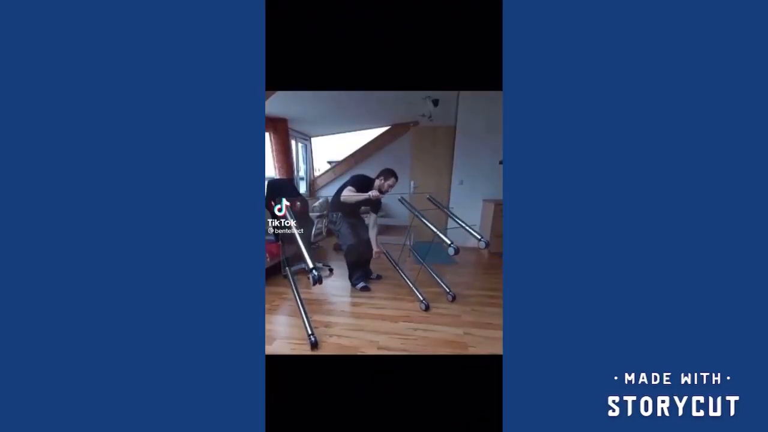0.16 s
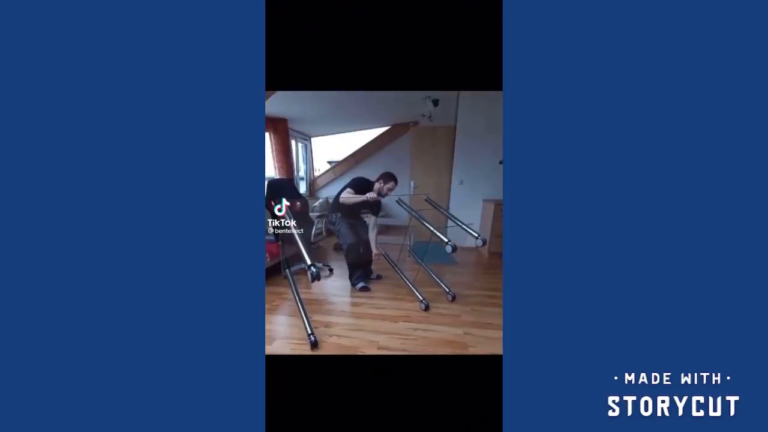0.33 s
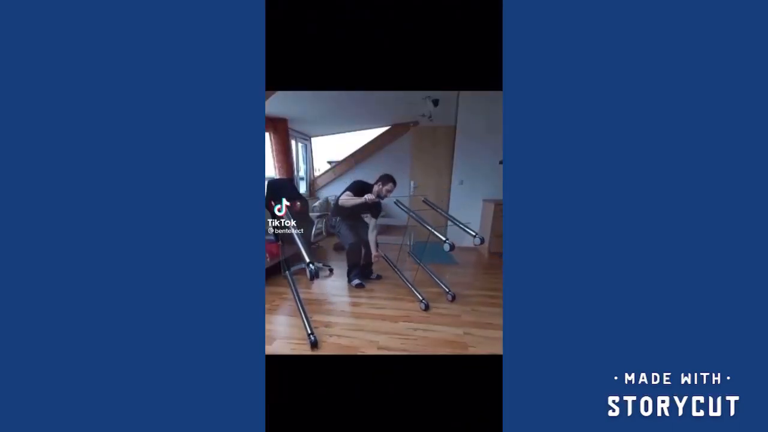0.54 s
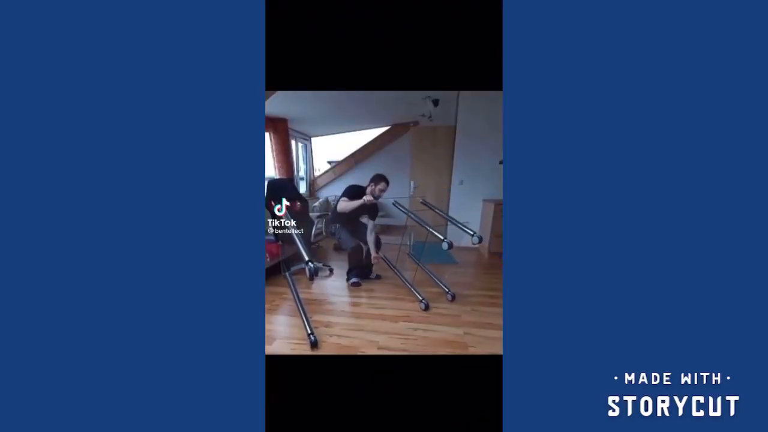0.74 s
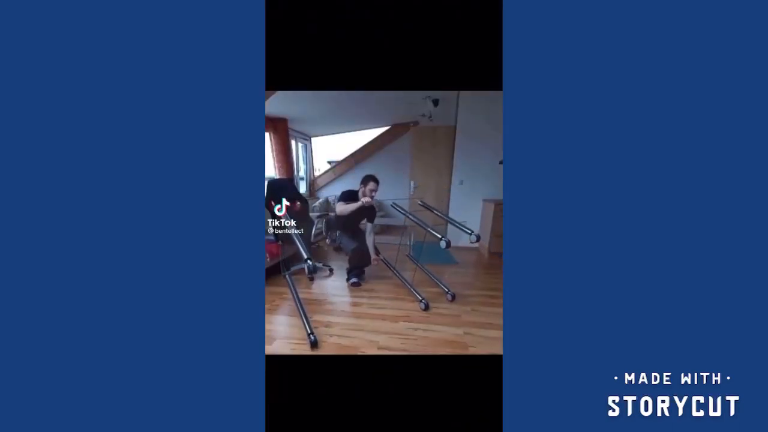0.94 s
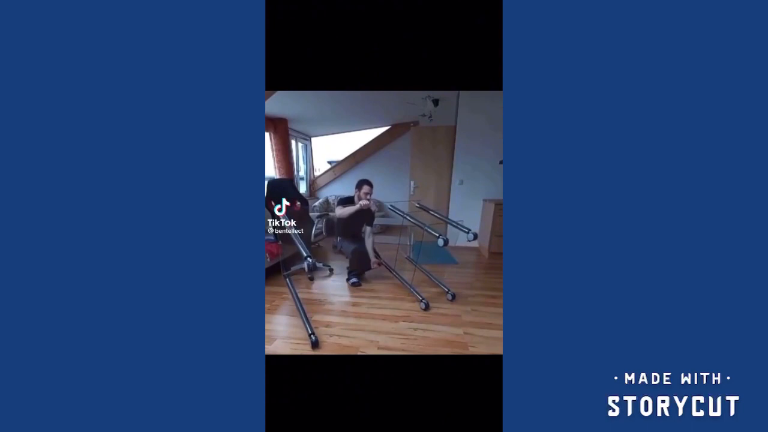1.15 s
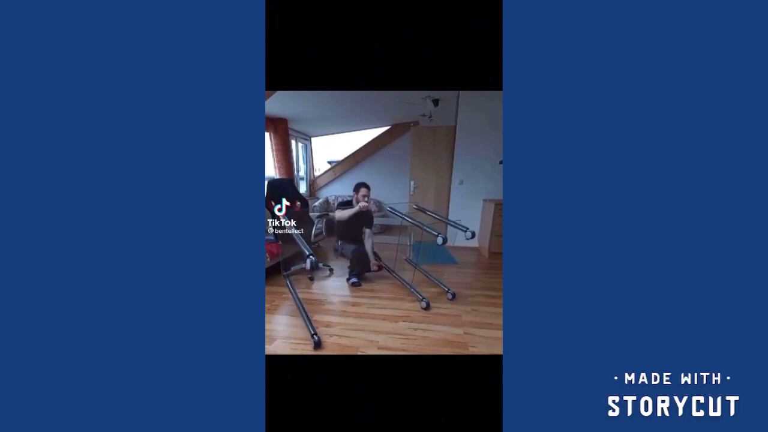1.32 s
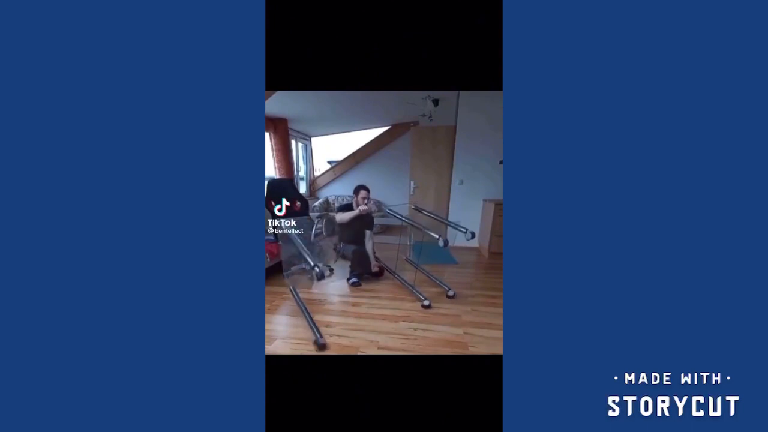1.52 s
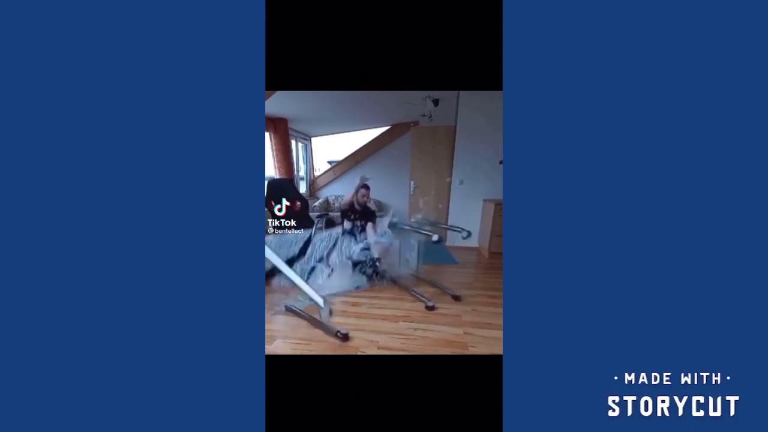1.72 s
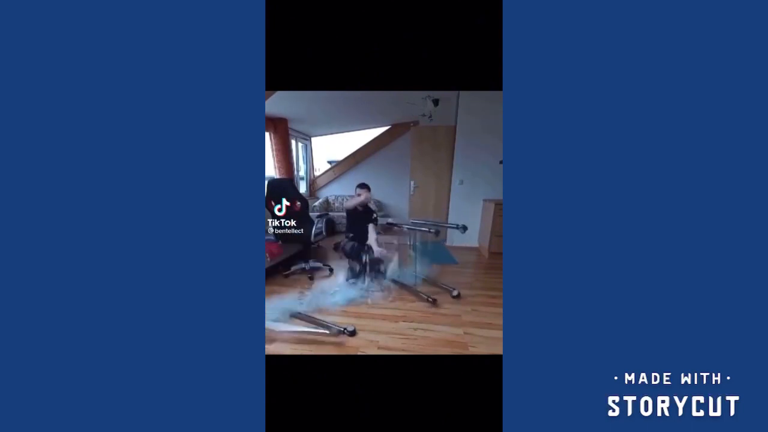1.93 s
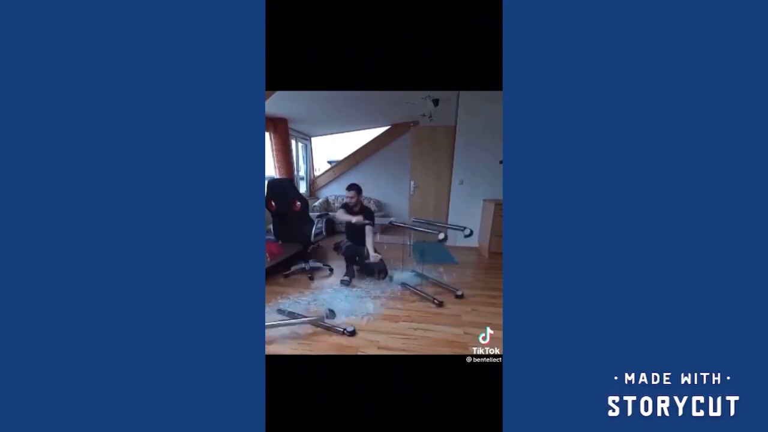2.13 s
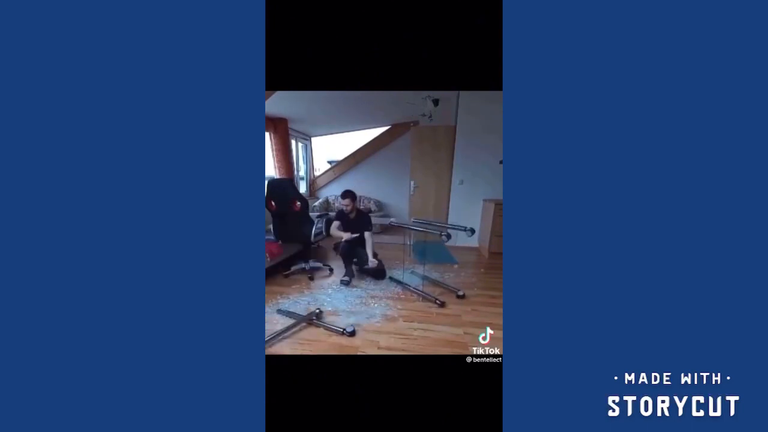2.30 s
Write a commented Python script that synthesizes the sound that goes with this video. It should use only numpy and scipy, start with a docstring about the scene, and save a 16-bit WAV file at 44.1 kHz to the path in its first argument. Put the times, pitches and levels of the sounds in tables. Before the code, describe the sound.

Large glass pane bursts with a crash, shards showering onto floorboards amid metal frame clangs

```python
"""A glass pane judders against its steel frame, cracks and bursts: clicks in quick bursts, coloured by filters.
Then crumbs of glass shower down, each contact a click with a brief ring at its own pitch. Clumps of glass drum
and land on a wooden floor, as random impacts through the tone of the boards. The floor rumbles with many small
jolts filtered down to the bass; the frame bumps and thuds, and the pane rings out, as fading sine waves. Scuffs
and a faint swish of cloth come early, and quiet air noise with a hum lies under it all in a bare room."""
import sys
import numpy as np
from scipy import signal
from scipy.fft import rfft, irfft
from scipy.io import wavfile
from scipy.ndimage import uniform_filter1d

SR = 44100
rng = np.random.default_rng(int(sys.argv[2]) if len(sys.argv) > 2 else 0)


def master_out(mix):
    """Clip the mix to full scale and print it as 16-bit PCM to the path in sys.argv[1]."""
    frames = np.transpose(np.atleast_2d(mix))
    ceiling = np.clip(frames, -1, 1)
    pcm = np.round(ceiling * 32767).astype(np.int16)
    wavfile.write(sys.argv[1], SR, pcm)


N = 108530  # length in samples

# Tone of the still air in the room: (frequency [Hz], level [dB])
AIR_TONE = [(30, -27), (60, -15), (85, -8), (115, 1), (170, -17.5), (215, -9), (255, -0.5), (310, -7),
            (360, -8), (420, -18), (500, -11.5), (640, -21.5), (800, -29.5), (1100, -12.5), (1300, -25),
            (1650, -10.5), (2300, -28), (4200, -22.5), (7000, -34.5), (12500, -42), (15000, -59)]
AIR_DB = -51.5
HUM_HZ, HUM_WIDTH_HZ, HUM_DB = 242.5, 5.1, -55.5

# Faint high swish of cloth: (time [s], level [dB])
SWISH_LEVEL = [(.44, -85), (.52, -58.5), (.56, -64), (.62, -89)]
# Tone of the cloth: (frequency [Hz], level [dB])
SWISH_TONE = [(5000, -24), (9000, -14), (12500, 3), (15000, -17)]
# Scuffs over the floor: (time of peak [s], rise [s], fall [s], level [dB])
SCUFF_EVENTS = [(0.0, 0.06, 0.031, -50), (0.252, 0.072, 0.07, -43.5), (.765, 0.058, 0.066, -41),
                (0.999, 0.06, 0.12, -49.5)]
# Tone of the scuffing: (frequency [Hz], level [dB])
SCUFF_TONE = [(290, -35), (500, -5.5), (602, -26), (859, -20), (1080, -9), (1260, -12.5), (1610, -2),
              (2170, -13), (3510, -8.5), (7910, -21), (12600, -22), (15000, -37)]

# Boom of the floor under the sliding, toppling frame: (time [s], level [dB])
BOOM_LEVEL = [(1.28, -58), (1.42, -50), (1.48, -50), (1.62, -34), (1.8, -33), (1.9, -31), (2.2, -30),
              (2.33, -27), (2.46, -30)]
# Tone of the boom: (frequency [Hz], level [dB])
BOOM_TONE = [(28, -22), (48, -5.5), (64, -10.5), (80, 1), (95, 3.5), (130, -1.5), (160, -4), (200, -16)]

# Hollow bumps of the frame: (time [s], level [dB], contact [s])
BUMP_EVENTS = [(.198, -43, 0.013), (.225, -44, 0.009), (1.127, -35.5, 0.019), (1.16, -39.5, 0.018),
               (1.527, -30.5, 0.0064), (1.553, -44, 0.0044)]
# Ringing tones of the bumped frame: (frequency [Hz], level [dB], time to fall 60 dB [s])
BUMP_MODES = [(249, -10, 0.15), (302, -3.5, 0.11), (345.6, -3, 0.12), (422, -5, 0.087), (493, -1.5, 0.061),
              (593, -7.5, 0.079), (688, -17, 0.12), (806, -13, 0.087)]
# Heavy knocks on the floor: (time [s], level [dB], contact [s])
THUD_EVENTS = [(.235, -50, .015), (1.267, -31, 0.013), (1.453, -30.5, 0.02), (1.755, -23, 0.0087),
               (1.87, -22, 0.015), (2.315, -22, 0.014)]
# Ringing tones of the knocked floor: (frequency [Hz], level [dB], time to fall 60 dB [s])
THUD_MODES = [(71, -6, 0.19), (86, 5.5, .22), (104.7, -2.5, 0.4), (128.4, -3, 0.43), (225, -5, 0.29),
              (289, -8.5, 0.46), (378, -15, 0.98)]
# Blows that set the glass pane ringing: (time [s], level [dB], contact [s])
CLANG_EVENTS = [(1.275, -50.5, 0.0047), (1.61, -41, 0.004), (1.70, -22.5, 0.0018), (1.768, -23, 0.0053),
                (1.797, -20.5, .006), (1.94, -22, 0.0051), (2.15, -26, .003), (2.23, -22.5, 0.0019),
                (2.375, -21.5, 0.0035)]
# Ringing tones of the glass pane: (frequency [Hz], level [dB], time to fall 60 dB [s])
PANE_MODES = [(1104, -1, 0.71), (1330, -22, .4), (1567, 5, 0.22), (1620, 6, 0.39), (1760, -5, 0.4),
              (1791, 0, 0.7), (1850, 5, 0.23), (1989, 3, 0.18), (3368, -4, 0.52), (4060, -4, 0.11),
              (4000, -2, 0.35), (5000, -25, 0.5)]

# Large clumps of glass landing on the boards: (time [s], level [dB])
LANDING_EVENTS = [(1.842, -20.5), (1.889, -23), (1.942, -19.5), (1.968, -15.5), (2.018, -21.5),
                  (2.048, -16), (2.22, -23), (2.31, -24.5), (2.376, -19.5)]
LANDING_T60_S = 0.06
# Small clumps pattering on the boards: (time [s], level [dB])
DRUMMING_LEVEL = [(1.75, -39), (1.825, -28.5), (1.85, -17), (1.95, -15.5), (2.06, -19), (2.15, -16.5),
                  (2.24, -18.5), (2.37, -21.5), (2.46, -24)]
# Tone of clumps on the boards: (frequency [Hz], level [dB])
BOARD_TONE = [(53, -20.5), (90, -7.5), (140, -3), (183, -5.5), (253, -2), (312, -2.5), (355, -2),
              (413, -0.5), (486, -0.5), (765, -5.5), (1100, -4.5), (1290, -8), (1450, -11), (1880, -61),
              (3190, -120)]
# Ringing tones of the boards: (frequency [Hz], level [dB], time to fall 60 dB [s])
BOARD_MODES = [(280, -17, 0.11), (348, 1, 0.42), (354.2, 6, 0.23), (503, 1, 0.36), (1080, -19, 0.092),
               (1131, 14, 0.064)]
CLUMPS_PER_S, CLUMP_SPREAD_DB = 900, 2
BOARD_RING_DB = -8.5  # ringing against the plain impacts

# Knocks of the pane on its frame: (time [s], level [dB], time to fall 60 dB [s], tilt [dB per octave])
CLATTER_EVENTS = [(1.266, -42, 1, -4), (1.436, -41.5, 0.45, -1.5), (1.52, -33.5, 0.29, -3),
                  (1.593, -28, 0.58, -0.5), (1.65, -21.5, 0.38, 0), (1.675, -12.5, 0.12, -2),
                  (1.688, -16, 0.078, 0), (1.701, -15.5, 0.07, -2), (1.74, -14.5, .05, 3.5)]
# Tone of the knocking pane: (frequency [Hz], level [dB])
CLATTER_TONE = [(59, -61), (100, -11), (159, -11.5), (337, -2), (482, -8.5), (646, -6), (764, -8),
                (942, -3), (1430, -6.5), (1700, -4), (2520, -20), (3250, -15), (4730, -22), (5150, -26.5),
                (15000, -50.5)]
# Sharp ticks and cracks of the glass: (time [s], level [dB], time to fall 60 dB [s], tilt [dB per octave])
CRACK_EVENTS = [(1.271, -46, 0.22, 3.5), (1.435, -46, 0.09, 5.5), (1.598, -41, 0.22, 0),
                (1.692, -23, 0.025, -6.5), (1.743, -28, 0.066, 1.5)]
# Tone of the cracks: (frequency [Hz], level [dB])
CRACK_TONE = [(400, -24), (1600, 13.5), (2600, 7.5), (4000, 4.5), (5600, 2.5), (7000, -9), (12500, -11.5),
              (15500, -27)]
CHATTER_RISE_S, CRACK_RISE_S = 0.02, 0.0085

# Shower of glass crumbs: (time [s], level [dB])
SHOWER_LEVEL = [(1.742, -70), (1.75, -18), (1.80, -19.5), (1.87, -16), (2.05, -16), (2.15, -16), (2.3, -17),
                (2.46, -21.5)]
# Tone of the shower: (frequency [Hz], level [dB])
SHOWER_TONE = [(820, -44), (1400, -8), (1630, -1), (1870, -3), (2270, -9), (2670, -10), (3430, -7),
               (3910, -4.5), (5560, -10.5), (6790, -18), (8910, -17.5), (9860, -22), (12500, -20.5),
               (15500, -46)]
SHARDS_PER_S, SHARD_SPREAD_DB = 5500, 3
SHARD_T60_S = 0.025  # middle value; each contact varies around it
SHARD_CLICK = 0.99  # click height against the strength of the hit

ROOM_T60_LOW_S, ROOM_T60_HIGH_S, ROOM_CUT_HZ = 0.53, 0.39, 184
LIMIT_DB, LIMIT_S = -11, 0.011
TOP_HZ = 15700


def undb(db):
    """Turn decibels into gain."""
    return 10 ** (np.asarray(db) / 20)


def clock():
    """Give the time of every sample in seconds."""
    return np.arange(N) / SR


def unit(x):
    """Scale a sound to an average (rms) strength of 1."""
    return x / np.sqrt(np.mean(x ** 2))


def fade(t60):
    """Die away by 60 dB in t60 seconds."""
    return np.exp(-np.log(1000) * clock() / max(t60, 1e-3))


def onset(seconds):
    """Rise smoothly from 0 to 1."""
    progress = np.minimum(clock() / max(seconds, 1e-4), 1)
    return np.sin(np.pi / 2 * progress) ** 2


def swell(curve):
    """Follow (time, level) points with the gain, all but silent before the first."""
    times, levels = np.array(curve).T
    return undb(np.interp(clock(), times, levels, left=-200))


def through(x, response):
    """Pass a sound through something by convolving with its response to one click."""
    return signal.fftconvolve(x, response)[:N]


def colour(x, tone, tilt_db=0, skirt_db=24, size=4096):
    """Filter through (Hz, dB) points, with a tilt and a falling skirt beyond the ends, in dB per octave."""
    hz, db = np.array(sorted(tone)).T
    octave = np.log2(np.maximum(np.fft.rfftfreq(size, 1 / SR), 10))
    knots = np.log2(hz)
    tilt = tilt_db * (octave - knots.mean())
    skirt = skirt_db * abs(octave - np.clip(octave, knots[0], knots[-1]))
    gain_db = np.interp(octave, knots, db) + tilt - skirt
    # Fold the cepstrum so that the filter answers at once and never ahead of its input
    cepstrum = irfft(np.log(undb(gain_db) + 1e-6))
    cepstrum[1:size // 2] *= 2
    cepstrum[size // 2 + 1:] = 0
    return through(x, irfft(np.exp(rfft(cepstrum))))


def ring(modes, jitter=0.002):
    """Sum the fading sine waves of one blow, each slightly and randomly off its pitch."""
    total = np.zeros(N)
    for hz, db, t60 in modes:
        pitch = hz * (1 + jitter * rng.standard_normal())
        strength = rng.choice([-1, 1]) * undb(db)
        total += strength * fade(t60) * np.sin(2 * np.pi * pitch * clock())
    return total


def place(x, at, db, size=882):
    """Start a sound at a time, with its loudest 20 ms at the given level."""
    start = max(int(at * SR), 0)
    loudest = np.sqrt(uniform_filter1d(x ** 2, size, mode="constant").max())
    return np.pad(x, (start, 0))[:N] * undb(db) / loudest


def blows(events, modes):
    """Strike a set of ringing tones; a longer, softer contact starts them more slowly."""
    return sum(place(ring(modes) * onset(contact), at, db) for at, db, contact in events)


def contacts(per_s, spread_db):
    """Scatter impacts at random moments, many light and a few heavy."""
    chance, weight, sign = rng.random(N), rng.exponential(size=N), rng.choice([-1, 1], N)
    return (chance < per_s / SR) * sign * undb(spread_db * np.minimum(weight, 5))


def bursts(events, tone, per_s, spread_db, rise_s):
    """Make each event a quick swell of impacts that dies away, with its own tilt of tone."""
    total = np.zeros(N)
    for at, db, t60, tilt in events:
        hits = contacts(per_s, spread_db) * onset(rise_s) * fade(t60)
        total += place(colour(hits, tone, tilt_db=tilt), at, db)
    return total


def room(x, wet_db):
    """Add the spread-out echo of bare walls, shorter in the treble and weak in the deep bass."""
    high_pass = signal.butter(2, ROOM_CUT_HZ, "high", fs=SR, output="sos")
    noise = signal.sosfilt(high_pass, rng.standard_normal(N))
    low = signal.sosfilt(signal.butter(1, 2500, fs=SR, output="sos"), noise)
    tail = low * fade(ROOM_T60_LOW_S) + (noise - low) * fade(ROOM_T60_HIGH_S)
    tail *= 1 - fade(0.034)  # the echo builds up gradually
    echo = through(x, tail / np.linalg.norm(tail))
    return (x + undb(wet_db) * echo) / np.hypot(1, undb(wet_db))


def background():
    """Mix low steady room noise with a hum, made wavering by passing noise through a narrow peak."""
    air = unit(colour(rng.standard_normal(N), AIR_TONE))
    peak = signal.iirpeak(HUM_HZ, HUM_HZ / HUM_WIDTH_HZ, fs=SR)
    hum = signal.lfilter(*peak, rng.standard_normal(N))
    hum = unit(colour(hum, [(200, 0), (280, 0)]))
    return undb(AIR_DB) * air + undb(HUM_DB) * hum


def swish():
    """Brush cloth faintly: high filtered noise that swells and fades."""
    return swell(SWISH_LEVEL) * unit(colour(rng.standard_normal(N), SWISH_TONE))


def scuffs():
    """Rub over the floor: dense tiny impacts that swell and die with each slide."""
    t = clock()
    push = np.zeros(N)
    for at, rise, fall, db in SCUFF_EVENTS:
        rising = np.exp(-((t - at) / rise) ** 2)
        falling = 1 / np.cosh(np.minimum(abs(t - at) / fall, 10) * 1.3)
        push += undb(db) * np.where(t < at, rising, falling)
    return push * unit(colour(contacts(9000, 2.5), SCUFF_TONE))


def boom():
    """Rumble the whole floor with many small jolts, filtered down to the bass."""
    return unit(colour(contacts(1500, 2.2), BOOM_TONE)) * swell(BOOM_LEVEL)


def frame():
    """Bump the frame, thud it on the floor and set the glass pane ringing, each ringing in the room."""
    bumps = room(blows(BUMP_EVENTS, BUMP_MODES), wet_db=2)
    thuds = room(blows(THUD_EVENTS, THUD_MODES), wet_db=1.5)
    clangs = room(blows(CLANG_EVENTS, PANE_MODES), wet_db=-5.5)
    return bumps + thuds + clangs


def boards(count=3):
    """Drum small clumps on the floorboards at several spots: impacts plus the ringing of the wood."""
    spots = []
    for _ in range(count):
        hits = contacts(CLUMPS_PER_S / count, CLUMP_SPREAD_DB)
        knocks = unit(colour(hits, BOARD_TONE, skirt_db=30))
        ringing = unit(through(hits, ring(BOARD_MODES)))
        wood = knocks + undb(BOARD_RING_DB) * ringing
        spots.append(wood * swell(DRUMMING_LEVEL) / np.sqrt(count))
    return spots


def landings():
    """Land each large clump on the boards as a short, tight burst of impacts."""
    total = np.zeros(N)
    for at, db in LANDING_EVENTS:
        hits = contacts(2500, 1.6) * fade(LANDING_T60_S)
        total += place(colour(hits, BOARD_TONE, tilt_db=-1.5), at, db)
    return total


def shards(size=3000, count=4):
    """Shower crumbs over several spots: each contact clicks and rings briefly at a random pitch."""
    t, out = clock()[:size], np.zeros((count, N + size))
    hits, spot = contacts(SHARDS_PER_S, SHARD_SPREAD_DB), rng.integers(count, size=N)
    pitch = rng.uniform(1400, 15000, N)  # Hz
    life = SHARD_T60_S * np.exp(rng.standard_normal(N) / 2)
    falling = clock() > SHOWER_LEVEL[0][0] - 0.02
    for i in np.flatnonzero(hits * falling):
        tone = np.sin(2 * np.pi * pitch[i] * t) * np.exp(-np.log(1000) * t / life[i])
        out[spot[i], i:i + size] += hits[i] * tone / np.sqrt(np.sum(tone ** 2))
        out[spot[i], i] += SHARD_CLICK * hits[i]
    sprays = [colour(row[:N], SHOWER_TONE, skirt_db=21) for row in out]
    gain = swell(SHOWER_LEVEL) / np.std(sum(sprays)[falling])
    return [spray * gain for spray in sprays]


def pane():
    """Chatter the pane on its frame and run cracks through it, both as bursts of tiny clicks."""
    chatter = bursts(CLATTER_EVENTS, CLATTER_TONE, 4500, 2.0, CHATTER_RISE_S)
    cracks = bursts(CRACK_EVENTS, CRACK_TONE, 9000, 3.6, CRACK_RISE_S)
    return chatter + cracks


def scene():
    """Mix the sources, most with their own room echo, over the background."""
    friction = room(scuffs() + swish(), wet_db=-3.5)
    drumming = sum(room(spot, wet_db=-0.5) for spot in boards())
    floor = room(landings(), wet_db=-2.5) + drumming + boom()
    shower = sum(room(spray, wet_db=0.5) for spray in shards())
    glass = room(pane(), wet_db=-0.5) + shower
    return (background() + friction + frame() + floor + glass)[None]


def record(dry):
    """Hold loud moments down as a phone's limiter does, round the peaks and cut the top treble."""
    power = uniform_filter1d(dry ** 2, max(int(LIMIT_S * SR), 1), axis=-1)
    held = dry / (1 + (power / undb(LIMIT_DB) ** 2) ** 2) ** (1 / 4)
    rounded = np.tanh(0.82 * held) / 0.78
    return signal.sosfilt(signal.ellip(10, 0.2, 80, TOP_HZ, fs=SR, output="sos"), rounded)


dry = scene()
out = record(dry)
master_out(out)
```